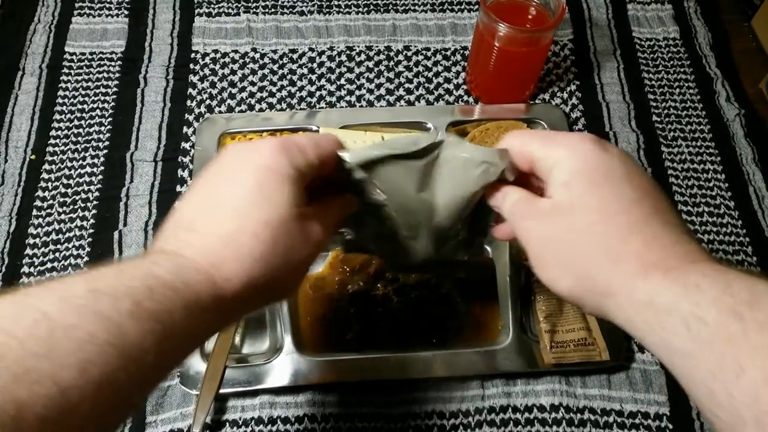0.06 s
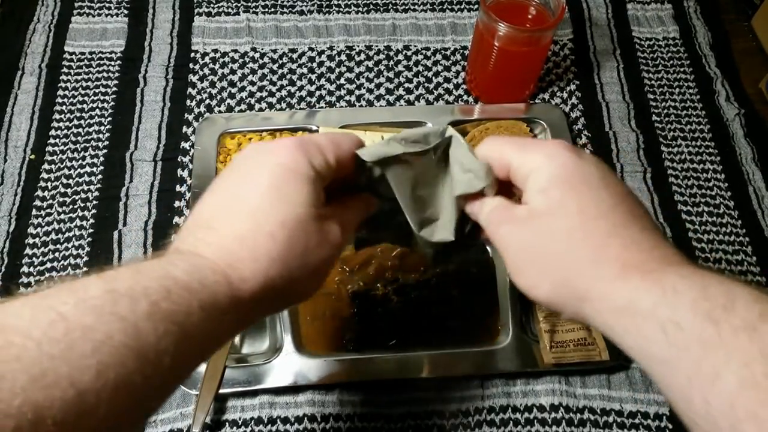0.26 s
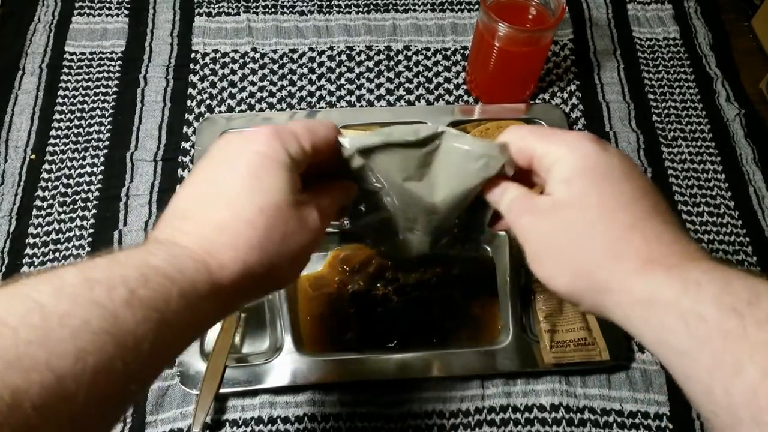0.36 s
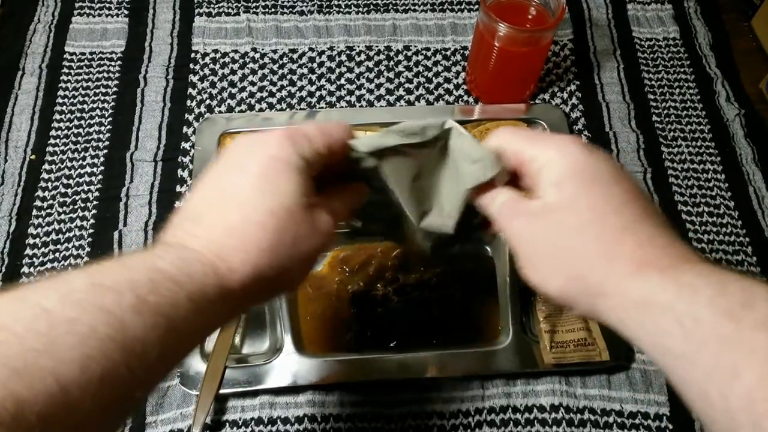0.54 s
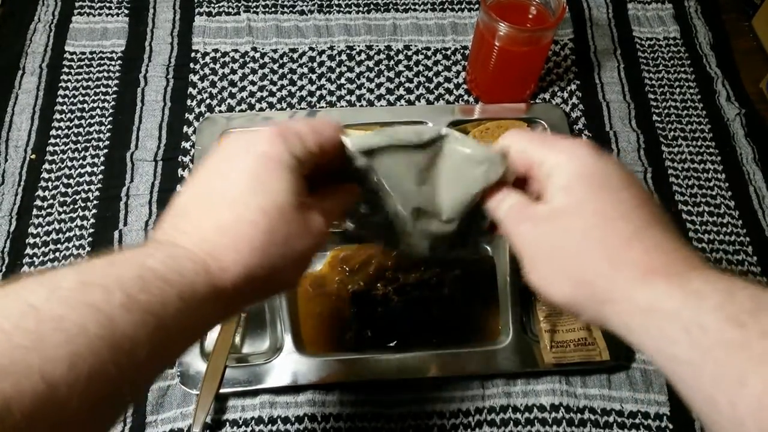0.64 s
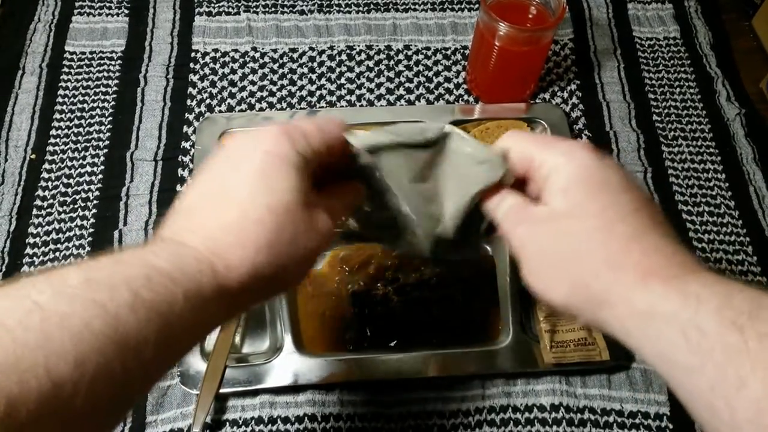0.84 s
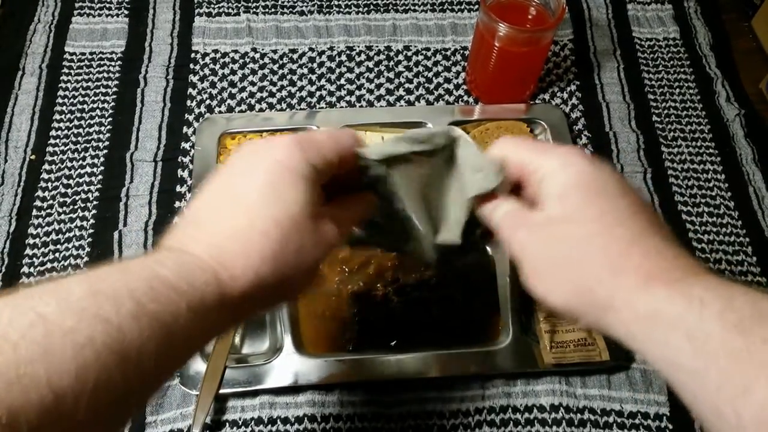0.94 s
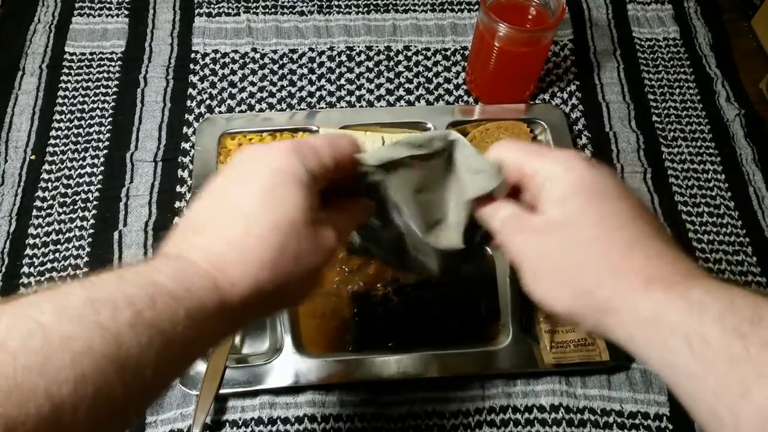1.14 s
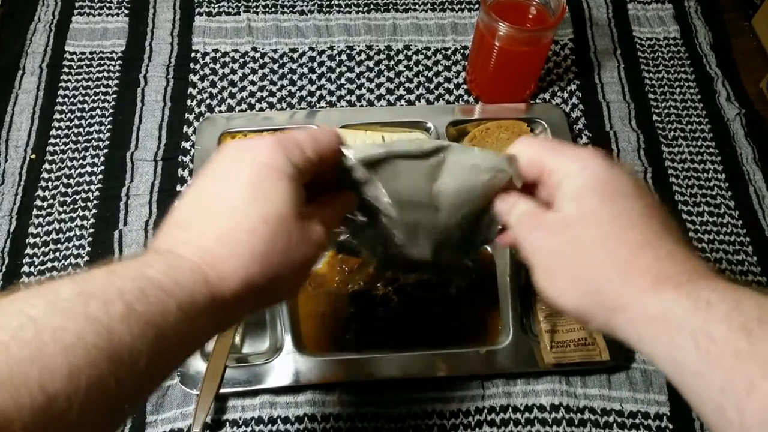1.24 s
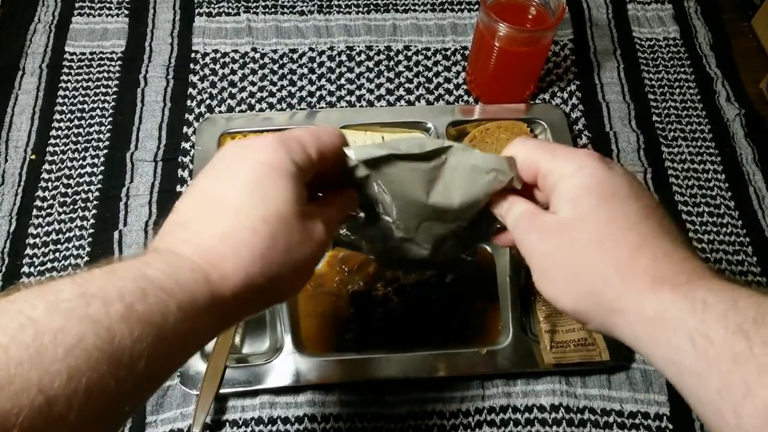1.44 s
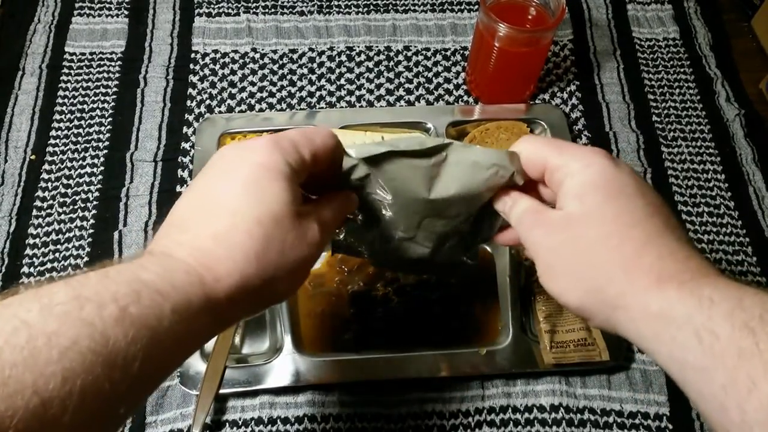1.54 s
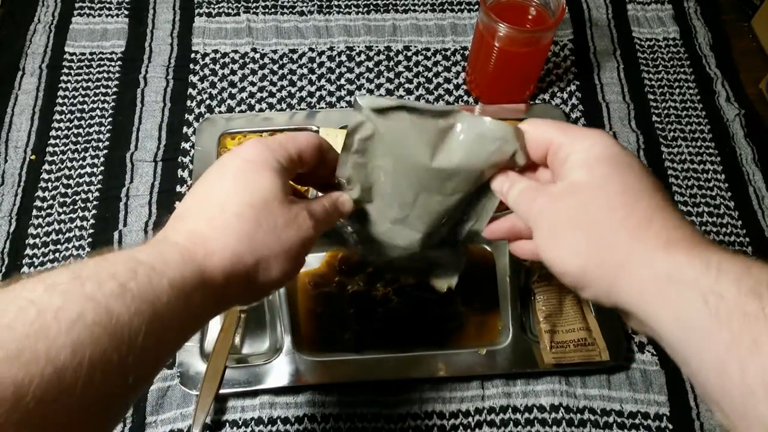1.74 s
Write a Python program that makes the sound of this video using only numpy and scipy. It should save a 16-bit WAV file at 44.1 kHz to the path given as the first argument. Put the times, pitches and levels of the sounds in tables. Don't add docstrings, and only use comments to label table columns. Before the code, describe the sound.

A stiff foil pouch crinkles in two hands above a metal tray, with one loud bright snap near the start, then uneven clusters of crackles, thinning out at the end; close stereo microphone, small kitchen, faint hum and hiss.

```python
import sys
import numpy as np
from scipy import signal
from scipy.fft import rfft, irfft, next_fast_len
from scipy.io import wavfile
from scipy.ndimage import uniform_filter1d

SR = 44100
rng = np.random.default_rng(int(sys.argv[2]) if len(sys.argv) > 2 else 0)


def output_pcm(signal):
    pcm = np.clip(np.atleast_2d(signal).T, -1, 1) * 32767
    wavfile.write(sys.argv[1], SR, np.round(pcm).astype(np.int16))


def linear_from_db(decibels):
    return 10 ** (np.asarray(decibels, float) / 20)


N = 77175
PORTS = np.array([[1], [-1]])

# start in seconds, crack level in dB, low thump in dB, wall ring in dB, treble share in dB.
CREASES = [(0.0044, -43, -46.5, -55, -28), (0.0734, -38.5, -45, -42, 1), (0.0831, -24.5, -42.5, -41.5, -3),
           (0.0874, -30.5, -36, -34.5, -11), (0.1041, -29, -45.5, -38, 1.5),
           (0.1223, -26.5, -49.5, -47.5, -4), (0.1826, -22.5, -41.5, -37.5, 3),
           (0.196, -26.5, -46, -31, -6), (0.2016, -9, -40, -30, 8.5), (0.2125, -24, -36, -35, -8),
           (0.2147, -28, -42.5, -35, -13), (0.2313, -22.5, -32, -34, -22), (0.2469, -49, -53, -44, -3),
           (0.322, -63, -60, -75, 8), (0.3606, -31.5, -48.5, -40.5, -4), (0.377, -40, -38.5, -39, 15),
           (0.376, -23.5, -36.5, -38, -1), (0.4386, -62, -46, -48, 0), (0.4686, -48, -38.5, -40, -1),
           (0.5021, -38, -51, -45.5, -17), (0.5235, -32.5, -46.5, -39.5, -11), (0.5619, -64, -52, -71, -5),
           (0.6039, -33, -48, -40.5, 0), (0.619, -34, -39.5, -37.5, 1), (0.6262, -41, -48, -33.5, -9),
            (0.6404, -35, -67, -54, -15), (0.6513, -38, -47.5, -45, -8), (0.6576, -23, -47.5, -41, -5.5),
            (0.684, -37, -49, -44.5, 2), (0.6905, -28.5, -57, -46, -16), (0.7023, -19, -49, -31, 3),
            (0.7102, -33, -65, -55, -8), (0.7278, -40, -34, -41.5, -12), (0.8165, -40.5, -60, -41, -1),
            (0.8389, -32, -62, -40.5, -21), (0.8412, -24.5, -35.5, -33, -11.5), (0.8435, -53, -40, -41, -4),
            (0.895, -28, -44.5, -39, 8), (0.923, -36, -55, -54, -2), (0.9286, -35.5, -48.5, -67, -12),
            (0.9411, -35.5, -61, -43.5, -8), (0.9792, -70, -56, -74, 0),
           (1.0059, -32, -49, -41.5, -2), (1.0243, -32.5, -39, -38, -7), (1.046, -22, -43.5, -35.5, -0.5),
           (1.096, -28, -45, -49, -5.5), (1.1046, -36, -41, -38, -15), (1.1282, -34.5, -35, -39, -21),
           (1.1636, -35.5, -71, -58, -4), (1.2066, -39.5, -49.5, -46, -5), (1.226, -20, -32, -30.5, -2),
           (1.2497, -24.5, -37.5, -33, -5.5), (1.2561, -25.5, -50, -37.5, -0.5),
           (1.2962, -31, -41, -34.5, -9), (1.2994, -26.5, -40.5, -45, -6), (1.3046, -19, -42, -33.5, -12),
           (1.3137, -20, -41, -29, -4), (1.3218, -27.5, -33.5, -34.5, -30), (1.34, -35, -57, -45, -10),
           (1.4033, -40.5, -40.5, -38.5, -7), (1.4261, -29.5, -39.5, -42, -1.5),
           (1.4634, -42, -54, -57, -9), (1.4831, -33, -48, -38.5, -14), (1.4947, -33.5, -54, -47, 3),
           (1.6454, -43.5, -53.5, -51.5, 3), (1.6635, -41, -59.5, -46, 14),
           (0.1842, -26.5, -60, -48, 1), (0.2155, -25, -63, -34.5, -4), (0.6595, -34.5, -62, -44, -13),
              (0.7, -35, -56, -58, -10), (0.2331, -22, -45, -41, 6), (0.25, -36, -46, -47, -8),
              (0.37, -33, -63, -60, -1), (0.6225, -33, -43, -45, -6), (0.7035, -22, -63, -34, -4),
              (1.4845, -35.5, -54, -44, -8), (1.4965, -28, -58, -43, -1.5), (1.2335, -27, -44, -46, 0),
              (1.0605, -37.5, -50, -41.5, -7), (1.0355, -42, -46, -42, -8)]
# time in seconds, thump centre in Hz, wall centre in Hz, crack centre in Hz.
POUCH_SHAPE = [(0.05, 375, 930, 3960), (0.192, 420, 1020, 5900), (0.274, 433, 960, 4950),
               (0.31, 301, 872, 4850), (0.348, 367, 820, 5060), (0.56, 336, 1010, 4050),
               (0.592, 382, 880, 5240), (0.652, 379, 836, 3930), (0.692, 397, 1110, 5800),
               (0.752, 423, 960, 5100), (0.802, 360, 1025, 3800), (1.124, 383, 940, 4940),
               (1.222, 344, 1020, 5100), (1.272, 395, 960, 4360), (1.496, 366, 966, 5100),
               (1.574, 306, 797, 4800), (1.658, 320, 965, 6000), (1.7, 324, 880, 5760)]
# frequency in Hz, level in dB, 60 dB decay in seconds.
THUMP_MODES = [(247, -10, 0.022), (311.3, -5.5, 0.044), (401.3, -1, 0.036), (452, -2.5, 0.025)]
# frequency in Hz, level in dB, 60 dB decay in seconds.
WALL_MODES = [(670, -8, 0.069), (774, -4.5, 0.044), (940, -4.5, 0.026), (1038.5, -1, 0.03),
              (1139, 1.5, 0.017), (1412, -6, 0.036), (1816, -6, 0.086)]


def snaps():
    t = np.arange(4096) / SR
    form = np.array(POUCH_SHAPE).T
    crack, body = np.zeros((2, 2, N + 2 * len(t)))
    body_lag_s, creak_db, creak_s, creak_skip = 0.001091, -14, 0.0035, 120
    for s, crack_db, thump_db, wall_db, treble_db in CREASES:
        thump_hz, wall_hz, crack_hz = (np.interp(s, form[0], v) for v in form[1:])
        bright = linear_from_db(crack_db) * foil_crack(t, crack_hz, treble_db)
        low = pouch_walls(t, thump_db, thump_hz, wall_db, wall_hz)
        i, j = max(int(s * SR) - 16, 0), int((s + body_lag_s) * SR)
        pan = linear_from_db(0.5 * rng.standard_normal() * PORTS)
        crack[:, i:i + len(t)] += pan * bright
        body[:, j:j + len(t)] += low
        creak = (bright + low)[:, creak_skip:] * np.exp(-t[:-creak_skip] / creak_s)
        k = min(i, creak.shape[1])
        crack[:, i - k:i] += linear_from_db(creak_db) * creak[:, ::-1][:, -i:]
    low_cut = signal.butter(2, 160, "high", fs=SR, output="sos")
    return crack[:, :N], signal.sosfilt(low_cut, body[:, :N])


# frequency in Hz, level in dB.
FOIL = [(900, -16), (1500, -2), (3000, -2), (5500, 1), (7500, -2), (10000, -8.5), (13000, -17),
        (16000, -45.5)]


def foil_crack(t, crack_hz, treble_db):
    burst_s, rise_s, after_s, after_db, unlike_db = 0.00089, 0.00015, 0.012, -9.5, -4.5
    burst = clicks(len(t), SR / 2, 4.5) * np.exp(-t / burst_s) * (1 - np.exp(-t / rise_s))
    both, left, right = (clicks(len(t), 3300, 2.5) for _ in range(3))
    after = (both + linear_from_db(unlike_db) * np.array([left, right])) * np.exp(-t / after_s)
    hz, peak_oct = crack_hz * 2 ** (0.3 * rng.standard_normal()), 0.33
    bump = [(hz * 2 ** -peak_oct, 0), (hz, 3), (hz * 2 ** peak_oct, 0)]
    tilt = [(2940, 0), (9000, treble_db), (16000, 2 * treble_db)]
    burst, after = np.roll(burst, 32), np.roll(after, 32, axis=-1)
    for colour in (FOIL, bump, tilt):
        burst, after = shape(burst, colour), shape(after, colour)
    after = shape(after, [(5000, 0), (11000, -7)])
    return burst / np.abs(burst).max() + linear_from_db(after_db) * after / np.abs(after).max()


def pouch_walls(t, thump_db, thump_hz, wall_db, wall_hz):
    low = linear_from_db(thump_db + 5) * ring(THUMP_MODES, t, thump_hz, 9)
    low = low + linear_from_db(wall_db + 3) * ring(WALL_MODES, t, wall_hz, 17.5)
    stir_db, stir_s = -13, 0.015
    stir = linear_from_db(stir_db) * clicks(len(t), 300, 1.3) * np.exp(-t / stir_s) / 1.01
    return low + signal.fftconvolve(low, stir)[:len(t)]


def ring(modes, t, centre_hz, focus_db):
    detune, scatter_db, push_s = 0.035, 2, 0.0011
    mode_hz, db, t60 = np.array(modes).T[:, :, None]
    chance = rng.standard_normal((3, len(modes), 1))
    hz = mode_hz * (1 + detune * chance[0])
    gain = linear_from_db(db + scatter_db * chance[1] - focus_db * np.abs(np.log2(hz / centre_hz)))
    tones = gain * np.sin(2 * np.pi * hz * t + chance[2]) * 1000. ** (-t / t60)
    y = tones.sum(axis=0) * (1 - np.exp(-t / push_s))
    return y / np.abs(y).max()


def clicks(size, per_s, rough_db):
    happen, sign, strength = rng.random((3, size))
    return (happen < per_s / SR) * np.sign(sign - 0.5) * linear_from_db(-rough_db * np.log(strength + 1e-4))


# time in seconds, rustle level in dB.
SQUEEZE = [(0.0, -65), (0.3, -63), (0.47, -57.5), (0.58, -63), (0.68, -58), (0.79, -65), (1.07, -55.5),
           (1.19, -60.5), (1.3, -55.5), (1.44, -56), (1.55, -67), (1.75, -111)]


def rustle():
    rustle_db, body_db, damping = -6.5, 8.5, 0.48
    at_s, level_db = np.array(SQUEEZE).T
    effort = linear_from_db(np.interp(np.arange(N) / SR, at_s, level_db) + rustle_db)
    ticks, t = clicks(N, 1500, 2.5), np.arange(4096) / SR
    walls = np.zeros(len(t))
    for hz, db, t60 in THUMP_MODES + WALL_MODES:
        walls += linear_from_db(db) * np.sin(2 * np.pi * hz * t) * 1000. ** (-t / (damping * t60))
    stir = unit(signal.fftconvolve(ticks, walls)[:N])
    return effort * unit(shape(ticks, FOIL)), linear_from_db(body_db) * effort * stir


# left delay in ms, right delay in ms, left level in dB, right in dB.
MIRRORS = [
    (1.12, 1.075, -7, -11.5),
    (2.3, 2.6, -11.5, -9.5),
    (3.6, 1.5, -5.5, -9.5),
    (6.3, 7.3, -6, -18),
]


def mirrors(crack):
    left = sum(linear_from_db(left_db) * lag(crack[0], left_ms) for left_ms, _, left_db, _ in MIRRORS)
    right = sum(linear_from_db(right_db) * lag(crack[1], right_ms) for _, right_ms, _, right_db in MIRRORS)
    return np.array([left, right])


def room(x, t60, db):
    t, gap_s = np.arange(SR // 3) / SR, 0.0048
    tail = rng.standard_normal((2, len(t))) * 1000. ** (-t / t60) * (1 - np.exp(-(t / gap_s) ** 2))
    tail = tail / np.sqrt((tail ** 2).sum(axis=1, keepdims=True))
    return linear_from_db(db) * signal.fftconvolve(x, tail, axes=1)[:, :N]


# frequency in Hz, level in dB per Hz.
HISS = [(15, -57), (25, -26), (125, 0.5), (202, -4.5), (1420, -23), (2780, -26.5), (8780, -30.5),
        (11500, -28), (15000, -29.5)]
# frequency in Hz, level in dB.
HISS_TOP = [(14300, 0), (14900, -41)]
# frequency in Hz, rms level in dB, wander in dB.
HUM = [(61.2, -68.5, 3.5), (119, -65.5, 6)]


def kitchen():
    mid, side = shape(shape(rng.standard_normal((2, N)), HISS), HISS_TOP)
    side = shape(side, [(30, 0), (120, -4), (500, -3), (3000, 0)])
    t = np.arange(N) / SR
    hum = np.zeros(N)
    for hz, db, wander_db in HUM:
        level = linear_from_db(db + wander_db * wander())
        hum += level * np.sqrt(2) * np.sin(2 * np.pi * hz * t + wander())
    return linear_from_db(-60 + 1.5) * (mid + side * PORTS) / np.std(mid) + hum


def wander():
    return unit(uniform_filter1d(uniform_filter1d(rng.standard_normal(N), 3000), 3000))


def shape(x, points):
    n, p = next_fast_len(x.shape[-1] + 64), np.array(points, float)
    f = np.maximum(np.arange(n // 2 + 1) * SR / n, 1)
    gain = linear_from_db(np.interp(np.log(f), np.log(p[:, 0]), p[:, 1]))
    return irfft(rfft(x, n) * gain, n)[..., :x.shape[-1]]


def unit(x):
    return x / np.sqrt(np.mean(x ** 2))


def lag(x, ms):
    n = next_fast_len(len(x) + 1024)
    f = np.arange(n // 2 + 1) * SR / n
    return irfft(rfft(x, n) * np.exp(-2j * np.pi * f * ms / 1000), n)[:len(x)]


# frequency in Hz, level in dB.
LEFT_SHADE = [(5000, -1), (12000, -1.5)]


def scene():
    left_db, left_body_db, left_lag_ms = -4.5, -2.5, 0.034
    (crack, body), (tick, stir) = snaps(), rustle()
    crack, body = crack + tick, body + stir
    crack = np.array([shape(crack[0], LEFT_SHADE), crack[1]])
    crack_pan = linear_from_db(left_db / 2 * PORTS)
    near = crack * crack_pan + body * linear_from_db(left_body_db / 2 * PORTS)
    near = np.array([lag(near[0], left_lag_ms), near[1]])
    dull = shape(crack, [(6000, 0), (12000, -5.5), (15500, -25)])
    tails = room(dull, 0.21, -6) + room(body, 0.16, -8)
    return near + mirrors(crack) * crack_pan + tails + kitchen()


def band_limit(x):
    return signal.sosfilt(signal.butter(12, 15640, fs=SR, output="sos"), x)


def record(dry):
    low_cut_hz, duck_db, duck_from_db, duck_s = 132, -14, -44.5, 0.01
    low = shape(dry, [(low_cut_hz, 0), (low_cut_hz * 4.7, -40)])
    busy = uniform_filter1d(((dry - low) ** 2).mean(axis=0), int(duck_s * SR))
    share = uniform_filter1d(busy / (busy + linear_from_db(duck_from_db) ** 2), int(duck_s * SR))
    mix = dry + low * (linear_from_db(duck_db * share) - 1)
    return band_limit(mix)


dry = scene()
out = record(dry)
output_pcm(out)
```